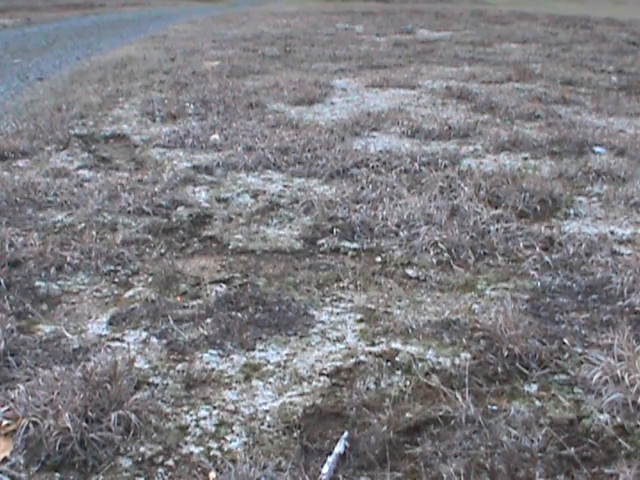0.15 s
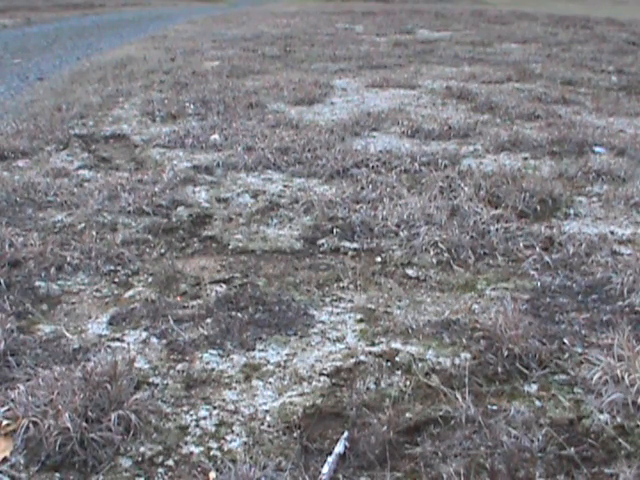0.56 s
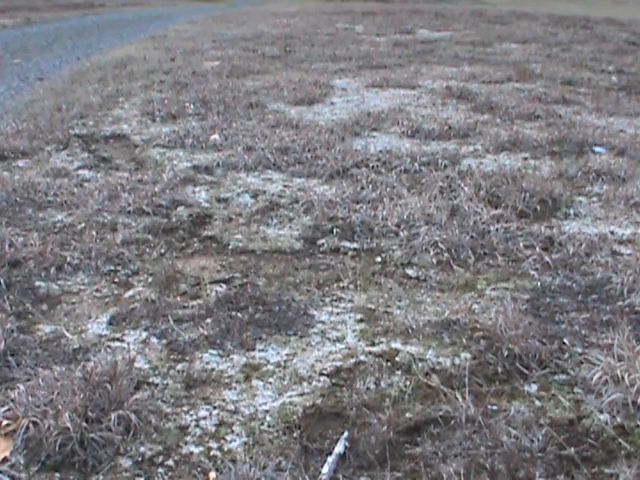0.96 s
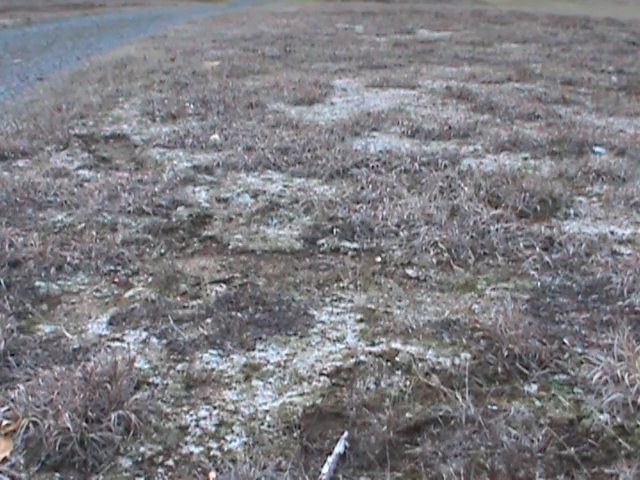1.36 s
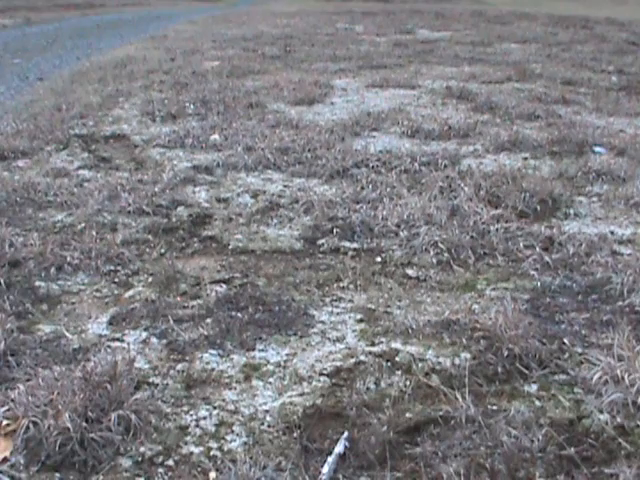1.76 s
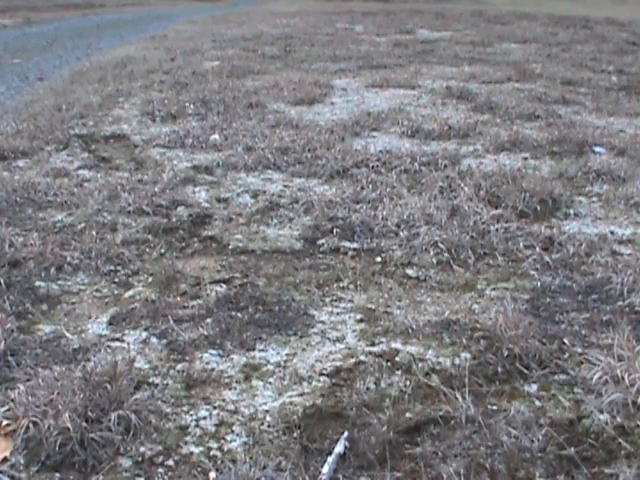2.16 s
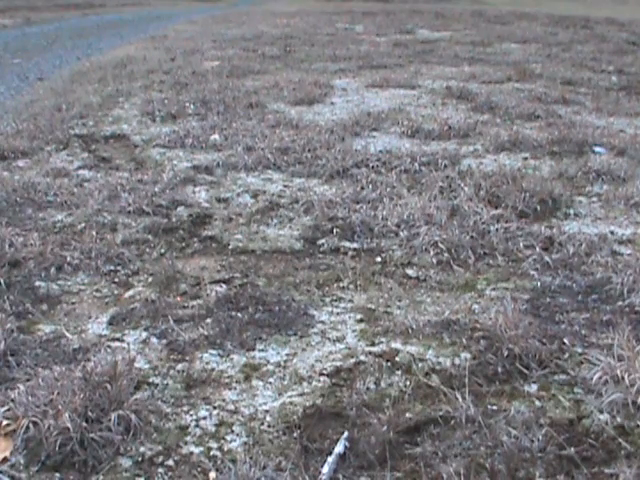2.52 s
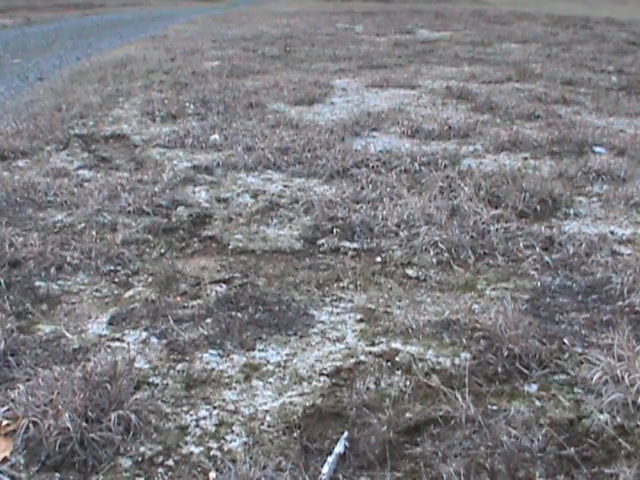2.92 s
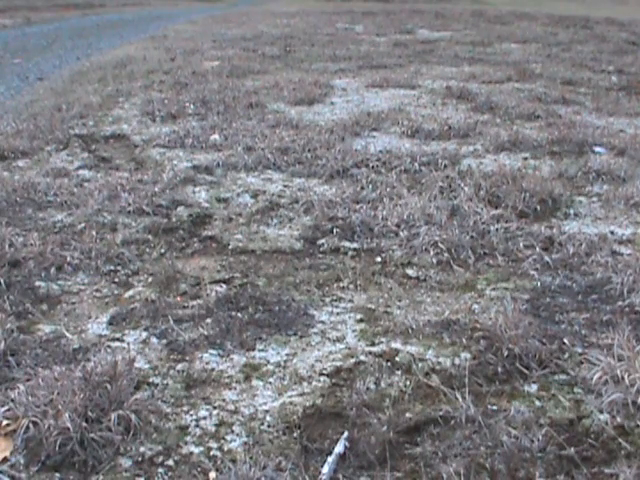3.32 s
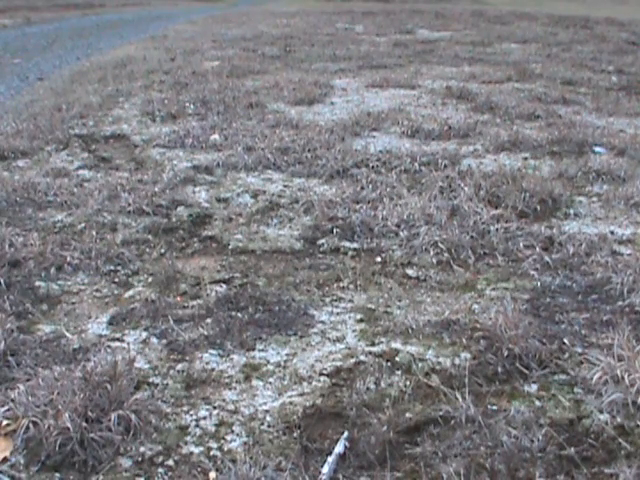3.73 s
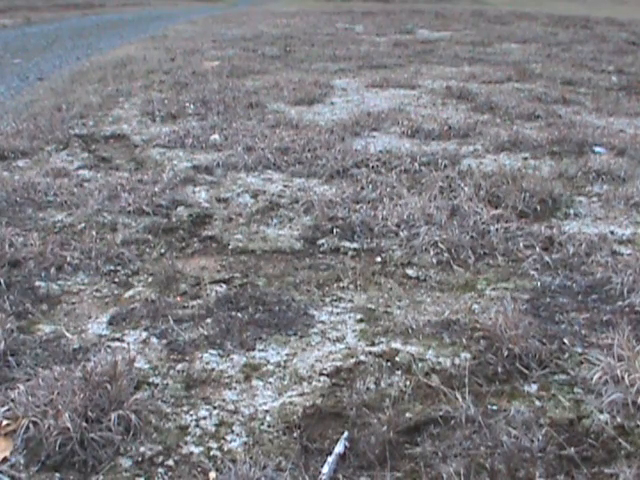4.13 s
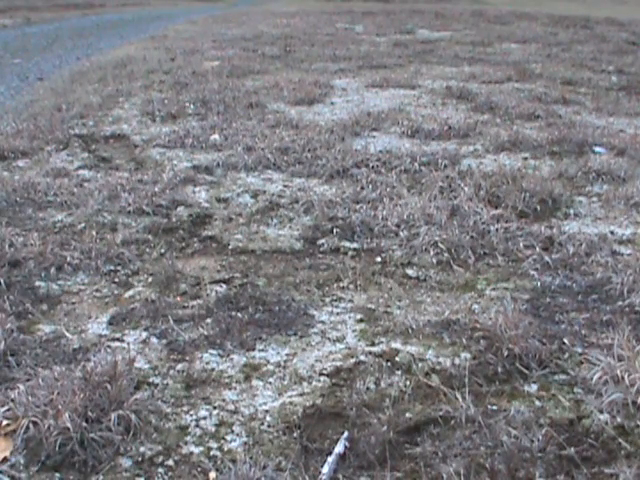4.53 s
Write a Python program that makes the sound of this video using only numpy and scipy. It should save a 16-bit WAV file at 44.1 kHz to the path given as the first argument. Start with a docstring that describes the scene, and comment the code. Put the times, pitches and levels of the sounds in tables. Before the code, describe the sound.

A faint, steady wash of distant tyres and engines runs throughout on an open range. A small bird gives a thin, very high whistle at the start, and more faint notes follow between about 1.1 and 2.3 seconds. Around 2.7 seconds a trigger ticks softly close by. At 2.8 seconds a suppressed small-calibre rifle fires one short, sharp pop with a spit of gas, the loudest moment. Almost instantly the bullet strikes stony ground, throwing up a burst of soil, with grit clicking until about 3 seconds. It ricochets away with a bright, fluttering, sweeping hiss over a quieter hum that rises in pitch, fading over roughly a second. Trees return a soft wash that grows duller, with a brief sharper echo at 3.6 seconds. The bird whistles twice around 4 seconds, and a far hill adds a faint low roll near the end.

```python
"""An open rifle range with stony ground, far trees and a distant road; small birds whistle thinly.
Near the microphones a suppressed small-bore rifle fires: trigger ticks, a short pop, a spit of gas.
The bullet strikes, sprays soil and tumbles away, its hiss chopped once a turn over a rising hum
and swept by its ground reflection. The trees return the shot, duller and duller; a hill answers last."""
import sys
import numpy as np
from scipy import signal
from scipy.fft import rfft, irfft, next_fast_len
from scipy.io import wavfile
from scipy.ndimage import uniform_filter1d, map_coordinates

SR = 44100
rng = np.random.default_rng(int(sys.argv[2]) if len(sys.argv) > 2 else 0)


def master_out(mix):
    """Clip the mix to full scale and print it as 16-bit PCM to the path in sys.argv[1]."""
    frames = np.transpose(np.atleast_2d(mix))
    ceiling = np.clip(frames, -1, 1)
    pcm = np.round(ceiling * 32767).astype(np.int16)
    wavfile.write(sys.argv[1], SR, pcm)


N = 206381
T = np.arange(N) / SR
SHOT_S, STRIKE_S = 2.8016, 2.8168  # the muzzle pops; the bullet meets the ground


def amp(db):
    """Decibels to gain."""
    return 10 ** (np.asarray(db) / 20)


def unit(x):
    """Scale to rms 1."""
    return x / np.sqrt(np.mean(x ** 2) + 1e-20)


def lean_left(db):
    """Stereo gains: the left microphone up by db, the right down as much."""
    return amp([[db], [-db]])


def since(start_s):
    """Seconds gone by since start_s, zero before it."""
    return np.maximum(T - start_s, 0)


def swell(start_s, attack_s, hold_s, fall_db_per_s):
    """Gain that rises evenly to 1, holds, then dies away."""
    rise = np.minimum(since(start_s) / attack_s, 1)
    return rise * amp(-fall_db_per_s * since(start_s + attack_s + hold_s))


def gate(start_s, length_s, edge_s):
    """Gain of a held note with soft edges."""
    return np.clip(np.minimum(T - start_s, start_s + length_s - T) / edge_s, 0, 1)


def wobble(rate_hz):
    """A smooth random curve with rate_hz knots a second."""
    return map_coordinates(rng.standard_normal(int(N * rate_hz / SR) + 4), [T * rate_hz])


def phase(hz):
    """Running angle of a changing frequency, in radians."""
    return 2 * np.pi * np.cumsum(hz) / SR


def delayed(channel, lag_s):
    """One channel heard late by a varying time."""
    return map_coordinates(channel, [(T - lag_s) * SR])


def filtered(x, response):
    """Filter x by a gain that is a function of frequency."""
    size = next_fast_len(N + SR // 2)
    return irfft(rfft(x, size) * response(np.fft.rfftfreq(size, 1 / SR)), size)[..., :N]


def noise(colour_db, side_db):
    """Stereo noise of rms 1; colour_db is a function of frequency, side_db sets the width."""
    mid, side = filtered(rng.standard_normal((2, N)), lambda hz: amp(colour_db(hz)))
    return unit(np.array([mid + amp(side_db) * side, mid - amp(side_db) * side]))


def rush(spectrum, side_db):
    """Noise that follows (frequency_hz, level_db) points on a log frequency axis."""
    points_hz, points_db = np.transpose(spectrum)
    return noise(lambda hz: np.interp(np.log(hz + 1), np.log(points_hz + 1), points_db), side_db)


def band(centre_hz, octaves, side_db):
    """Noise in one resonance."""
    return noise(lambda hz: -20 * np.log10(1 + (np.log2((hz + 1) / centre_hz) / octaves) ** 2 / 2), side_db)


def air(x, loss_db_per_s):
    """Later sound has come farther and lost more treble to the air; the loss is given at 1 kHz."""
    hz, times, spectra = signal.stft(x, SR, nperseg=256)
    loss_db = loss_db_per_s * np.outer((hz / 1000) ** 2, np.maximum(times - SHOT_S, 0))
    return signal.istft(spectra * amp(-loss_db), SR, nperseg=256)[1][:, :N]


def rough_ground(x, patchy_db):
    """Rough ground favours shifting patches of frequency, some hundred Hz wide and tens of ms long."""
    spectra = signal.stft(x, SR, nperseg=512)[2]
    patches = uniform_filter1d(rng.standard_normal(spectra.shape[1:]), size=4, axis=0)
    patches = uniform_filter1d(patches, size=5, axis=1)
    gain = unit(amp(patchy_db * unit(patches)))
    return signal.istft(spectra * gain, SR, nperseg=512)[1][:, :N]


# Tyres and engines, heard from far off the road: frequency_hz, level_db
TYRE_SPECTRUM = [(40, -30), (240, -9), (400, -10), (580, -10), (860, -3), (1080, -0.5), (1490, -6),
                 (2150, -10), (3300, -16.5), (5800, -21.5), (8300, -23), (11000, -23.5), (15500, -22.5)]
ENGINE_SPECTRUM = [(13, -50), (22, -31.5), (49, -6.5), (80, -7), (112, 0.5), (158, -1.5), (180, -8.5),
                   (228, -7.5), (290, -15.5), (360, -20), (500, -30), (1100, -78)]

def traffic(passing_s=2.82):
    """On a distant road, engines rumble under a wash of tyres that is loudest as the traffic passes."""
    tyres_db = -50 - 0.6084 * np.abs(T - passing_s) + 0.23 * wobble(4.72)
    tyres = amp(tyres_db) * rush(TYRE_SPECTRUM, side_db=-6.0)
    engines_db = -50.5 + 0.32 * T + 0.37 * wobble(5.07)
    return tyres + amp(engines_db) * rush(ENGINE_SPECTRUM, side_db=-29.5)


# A far bird, faint at the microphones: start_s, length_s, pitch_hz, level_db
FAR_BIRD_NOTES = [(1.12, .7, 8700, -76), (1.83, .17, 9100, -70), (1.997, 0.13, 8590, -64),
                  (2.14, 0.206, 8630, -74)]

def far_bird(waver=0.008, flutter_db=4.0):
    """A far bird holds thin, shaky notes."""
    out = np.zeros(N)
    for start_s, length_s, pitch_hz, level_db in FAR_BIRD_NOTES:
        tone = np.sin(phase(pitch_hz * (1 + waver * wobble(300))))
        out += amp(level_db + flutter_db * wobble(40)) * gate(start_s, length_s, edge_s=0.04) * tone
    return out


# A louder bird, centred between the microphones: start_s, length_s, held_pitch_hz, level_db
BIRD_WHISTLES = [(-.12, 0.17, 8050, -60), (1.875, 0.2, 7970, -65.5), (2.123, 0.14, 8000, -62.5),
                 (3.92, .175, 8140, -59), (4.147, 0.14, 7850, -63)]

def whistling_bird(sharp=0.09, settle_s=0.025, drop=0.27, flick_s=0.0106, waver=0.0042, swell_db=8):
    """Each thin whistle starts sharp, settles, and swells to a quick downward flick."""
    out = np.zeros(N)
    for start_s, length_s, held_hz, level_db in BIRD_WHISTLES:
        settling = np.exp(-since(start_s) / settle_s)
        flick = np.minimum(since(start_s + length_s - flick_s) / flick_s, 1)
        pitch_hz = held_hz * (1 + sharp * settling - drop * flick + waver * wobble(170))
        progress = np.minimum(since(start_s) / length_s, 1)
        level = amp(level_db + swell_db * (progress - 0.5) + 3.5 * wobble(60))
        out += level * gate(start_s, length_s, edge_s=0.0032) * np.sin(phase(pitch_hz))
    return out


# The shot as it comes back from the far hillside: frequency_hz, level_db
HILL_SPECTRUM = [(60, -21), (130, -4), (220, 1.5), (330, -9.5), (550, -21.5), (800, -8.5), (1050, -3),
                 (1500, -13), (3000, -41), (8000, -72)]

def hillside():
    """The far hillside answers last, with a low roll."""
    level = swell(start_s=3.594, attack_s=0.73, hold_s=0.21, fall_db_per_s=31)
    return level * amp(-46 + 0.91 * wobble(17)) * rush(HILL_SPECTRUM, side_db=-20)


# The wash from the far trees: frequency_hz, level_db
TREE_SPECTRUM = [(150, -15), (350, -5.5), (600, -6.5), (1100, 2.5), (2300, 3.5), (4000, -2.5), (7000, -13),
                 (11000, -24), (16000, -6)]
# Single echoes from banks and trunks: arrival_s, level_db, centre_hz, width_octaves, spread_s
RANGE_ECHOES = [(3.073, -40.5, 4700, 0.31, 0.013), (3.601, -34, 4570, 0.52, 0.0018),
                (3.619, -31, 5300, 0.55, 0.0036), (3.629, -38.5, 4200, 0.6, 0.0083),
                (3.21, -45, 3500, 0.56, 0.014), (3.43, -41.5, 132, 0.19, 0.012),
                (3.99, -47.5, 1990, 0.52, 0.047)]

def trees():
    """A wash builds as the shot reaches more trees, then dies away; a few echoes stand out."""
    level = swell(SHOT_S, attack_s=0.61, hold_s=0.13, fall_db_per_s=13)
    wash = level * amp(-40.5 + 0.9 * wobble(25.07)) * rush(TREE_SPECTRUM, side_db=-9.5)
    echoes = np.zeros((2, N))
    for arrival_s, level_db, centre_hz, octaves, spread_s in RANGE_ECHOES:
        bump = np.exp(-((T - arrival_s) / spread_s) ** 2 / 2)
        echoes += amp(level_db) * bump * band(centre_hz, octaves, side_db=-27.5)
    return air(wash, loss_db_per_s=0.07) + air(echoes, loss_db_per_s=0.37)


# Flying soil in front of the microphones: frequency_hz, level_db
SOIL_SPECTRUM = [(20, -8), (45, -15), (110, -25), (200, -23), (340, -3.5), (480, -7), (850, -7),
                 (1900, -6.5), (2500, 0.5), (4200, 0.5), (6300, -4.5), (9800, 0), (12400, -6.5),
                 (16000, -16)]
# Soil thrown up, then pattering down: start_s, level_db, attack_s, hold_s, fall_db_per_s
SOIL_SHOWERS = [(2.8154, -18.5, .008, .012, 172), (2.99, -49.5, .1, .01, 150)]

def soil_spray(clump_db=0.25, narrowing_s=0.039):
    """Soil and grit burst up in clumps, all around at first, then from straight ahead."""
    level = sum(amp(level_db) * swell(start_s, *shape) for start_s, level_db, *shape in SOIL_SHOWERS)
    wide_share = np.exp(-(since(SHOT_S) / narrowing_s) ** 4 / 2)
    around = np.sqrt(wide_share) * rush(SOIL_SPECTRUM, side_db=-2.5)
    ahead = np.sqrt(1 - wide_share) * rush(SOIL_SPECTRUM, side_db=-21)
    left, right = around + ahead
    # long waves reach both microphones alike
    side = filtered((left - right) / 2, lambda hz: hz / np.hypot(hz, 1800))
    grit = rough_ground((left + right) / 2 + np.array([side, -side]), patchy_db=1.5)
    clumps = unit(amp(clump_db * wobble(700)))
    return level * clumps * grit * lean_left(db=1.0)


# At the rifle: trigger, sear, its spring. Downrange: bullet on stone, on soil, then flying grit.
# start_s, level_db, centre_hz, width_octaves, t60_s
CONTACTS = [(2.6825, -53, 8500, 0.56, .02), (2.7320, -45, 9000, .35, 0.015),
            (2.7322, -48, 8450, 0.025, 0.02), (2.8175, -12.5, 11100, 0.19, 0.032),
            (2.818, -19.5, 1410, 1.9, 0.0094), (2.9092, -21, 10600, .3, .012),
            (2.9311, -28.5, 11500, 0.46, .01), (2.9533, -19, 10800, 0.12, 0.013),
            (3.007, -33.5, 2300, 0.36, 0.034), (3.014, -25, 10000, 0.38, 0.011)]

def contacts():
    """Each contact is a burst of noise that dies within hundredths of a second."""
    out = np.zeros((2, N))
    for start_s, level_db, centre_hz, octaves, t60_s in CONTACTS:
        level = (T >= start_s) * amp(level_db - 60 * since(start_s) / t60_s)
        out += level * band(centre_hz, octaves, side_db=-8.5)
    return out


def tumble(start_hz=169.5, end_hz=595, spin_up_s=0.475, approach_hz=91.74, approach_s=0.0319, waver=0.027):
    """Phase of the bullet's tumbling as heard at the microphones; it speeds up toward a steady rate."""
    flight_s = since(STRIKE_S)
    turn_hz = end_hz + (start_hz - end_hz) * np.exp(-flight_s / spin_up_s)
    turn_hz += approach_hz * np.exp(-flight_s / approach_s)  # raised while the bullet still closes in
    return phase(turn_hz * (1 + waver * wobble(120)))


def ground_reflection(x, bounce=0.5, start_lag_ms=0.12, end_lag_ms=0.368, climb_s=0.31):
    """The path by way of the ground lags more as the bullet climbs, so the comb's peaks slide down."""
    lag_ms = end_lag_ms + (start_lag_ms - end_lag_ms) * np.exp(-since(STRIKE_S) / climb_s)
    reflected = np.array([delayed(channel, lag_ms / 1000) for channel in x])
    return unit(x + bounce * reflected)


# The bullet's turbulent wake, heard only while it is near, and its hiss: frequency_hz, level_db
WAKE_SPECTRUM = [(100, -38), (220, -25), (350, 0), (520, -5), (750, -6.5), (1200, -34), (2500, -45)]
HISS_SPECTRUM = [(800, -22), (2500, -20), (5000, -8.5), (7000, -6), (9000, 1.5), (11500, 6), (13000, 1),
                 (14300, 2), (16000, -9)]

def ricochet(chop_db=6.0, overtone_db=-12, near_s=0.083, left_lead_s=16e-6, centring_s=0.085):
    """The tumbling bullet hums and sheds a puff of hiss at every turn, weaker as it slows and recedes."""
    turn = tumble()
    hum = np.sqrt(2) * amp(1.7 * wobble(50)) * (np.sin(turn) + amp(overtone_db) * np.sin(2 * turn))
    hum *= amp(-43) * swell(STRIKE_S, attack_s=0.05, hold_s=0.68, fall_db_per_s=80)
    wake = rush(WAKE_SPECTRUM, side_db=-19)
    wake *= amp(-42) * swell(STRIKE_S, attack_s=0.026, hold_s=0.046, fall_db_per_s=123)
    hiss = rough_ground(rush(HISS_SPECTRUM, side_db=-10.5), patchy_db=2.0)
    chop = amp(chop_db * np.cos(turn) + 0.1 * wobble(150))
    left, right = ground_reflection(hiss * chop)
    # the hiss starts left of the microphones and draws toward the centre
    hiss = np.array([left, delayed(right, left_lead_s / (1 + since(SHOT_S) / centring_s))])
    hiss *= amp(-19) * swell(STRIKE_S, attack_s=0.024, hold_s=0, fall_db_per_s=13)
    spreading = 1 / np.hypot(1, since(STRIKE_S) / near_s)  # distance takes 3 dB after near_s of flight
    return spreading * hum + wake + air(spreading * hiss, loss_db_per_s=0.22)


# Gas leaving the suppressor, close by: frequency_hz, level_db
GAS_SPECTRUM = [(300, -10), (1500, -13), (3000, 1.5), (6500, 3.5), (9000, 0), (12500, 3), (16000, -13)]
# Its puffs: start_s, level_db, attack_s, hold_s, fall_db_per_s
GAS_PUFFS = [(2.8001, -26.5, .0006, .0002, 1300), (2.806, -20, 0.0072, .0014, 12000)]

def suppressor_gas():
    """Trapped gas spits out, a little with the pop and more just after it."""
    level = sum(amp(level_db) * swell(start_s, *shape) for start_s, level_db, *shape in GAS_PUFFS)
    return level * rush(GAS_SPECTRUM, side_db=-1.5)


def muzzle_pop(ring_hz=3300, ring_q=1.3, body_q=0.43, muffle_hz=9000, level_db=-4.0):
    """The muzzle's single pressure pulse rings for about two cycles."""
    def resonance(hz, q):
        damping = 1j * hz * ring_hz / q
        return damping / (ring_hz ** 2 - hz ** 2 + damping)

    push = np.zeros(N)
    push[round(SHOT_S * SR)] = 1
    pulse = filtered(push, lambda hz: resonance(hz, ring_q) * resonance(hz, body_q)
                     / (1 + 1j * hz / muffle_hz))
    return amp(level_db) * pulse / np.abs(pulse).max()


def scene():
    """The range from the microphones: gas, contacts, bullet and echoes lie a little to the left."""
    near = (suppressor_gas() + contacts() + ricochet()) * lean_left(db=0.3)
    shot = muzzle_pop() + near + soil_spray()
    returns = (trees() + hillside()) * lean_left(db=0.35)
    return shot + returns + whistling_bird() + far_bird() + traffic()


def record(dry, top_hz=15950):
    """The camera's microphones keep nothing above a steep band limit."""
    return filtered(dry, lambda hz: 1 / np.sqrt(1 + (hz / top_hz) ** 200))


dry = scene()
out = record(dry)
master_out(out)
```